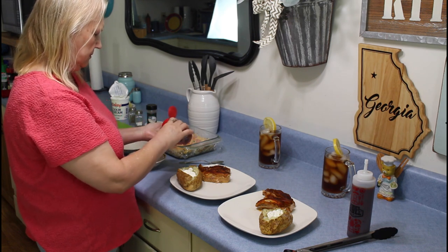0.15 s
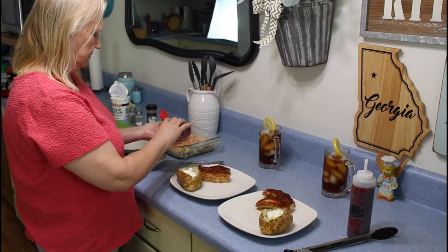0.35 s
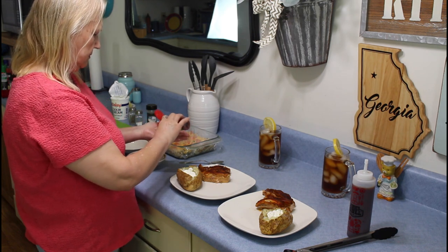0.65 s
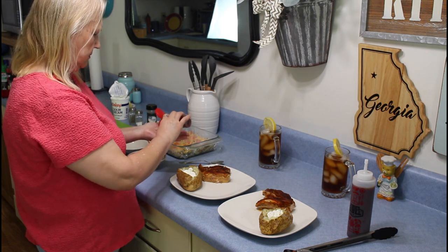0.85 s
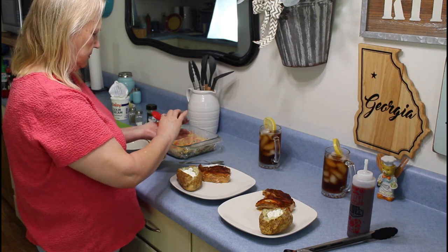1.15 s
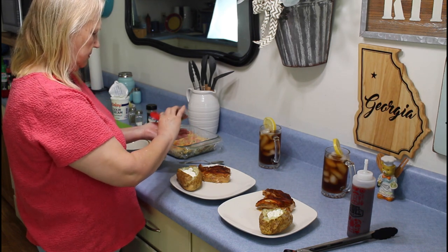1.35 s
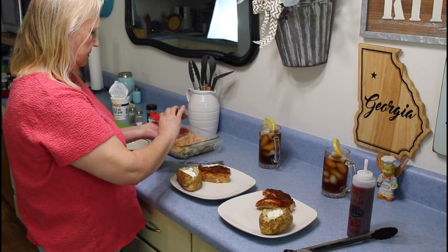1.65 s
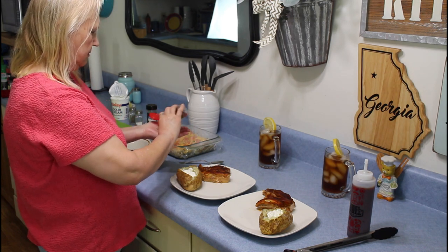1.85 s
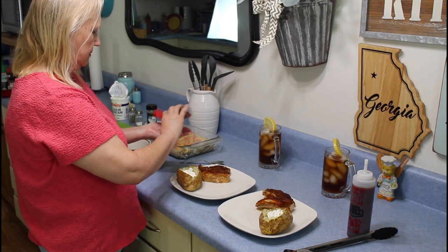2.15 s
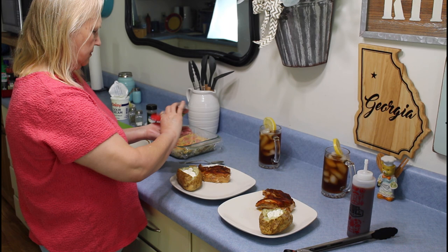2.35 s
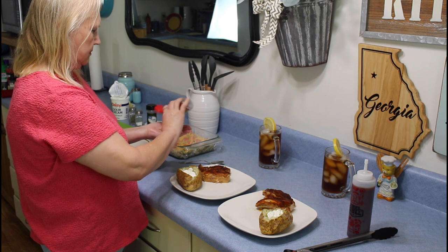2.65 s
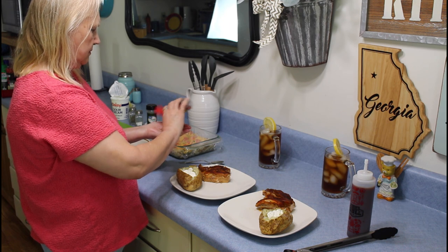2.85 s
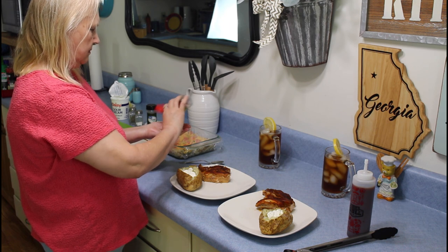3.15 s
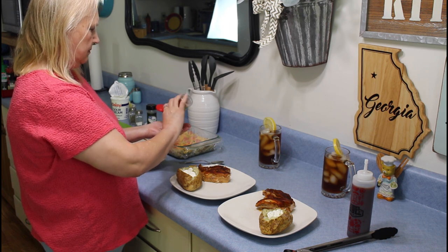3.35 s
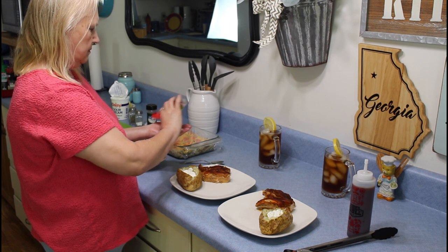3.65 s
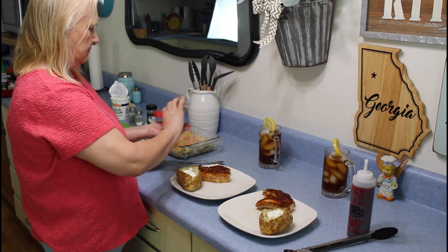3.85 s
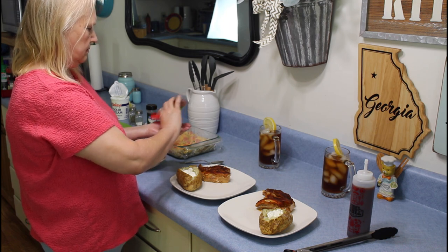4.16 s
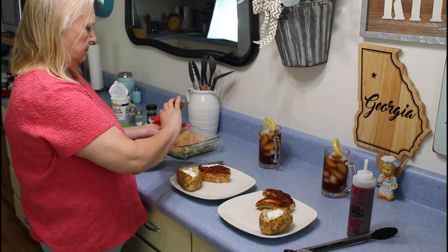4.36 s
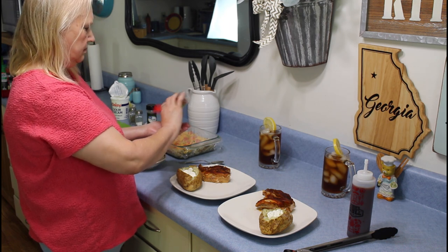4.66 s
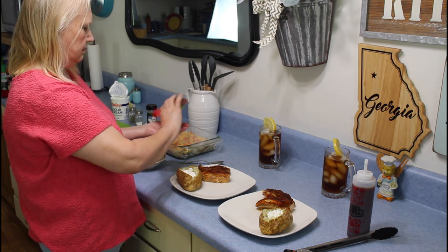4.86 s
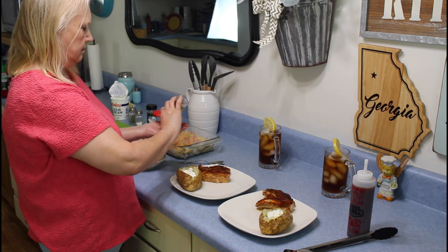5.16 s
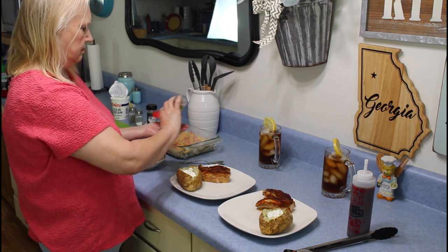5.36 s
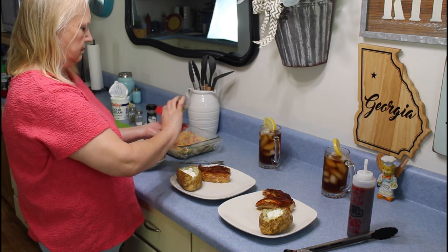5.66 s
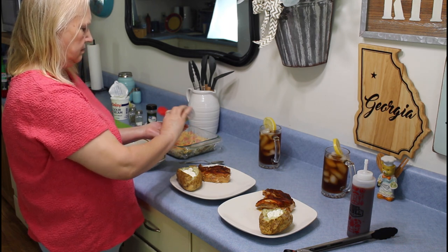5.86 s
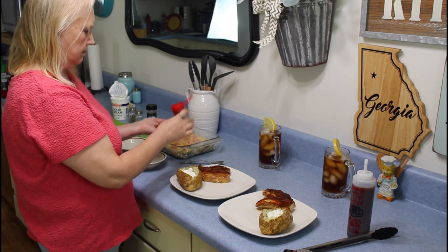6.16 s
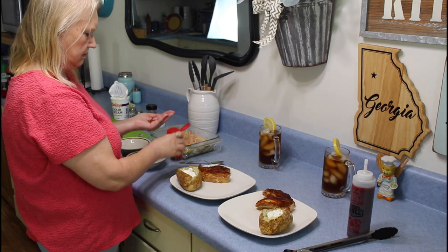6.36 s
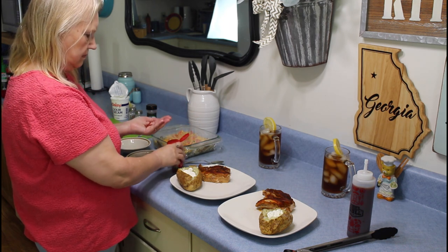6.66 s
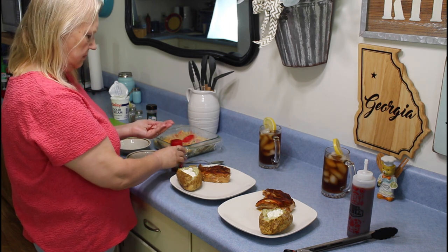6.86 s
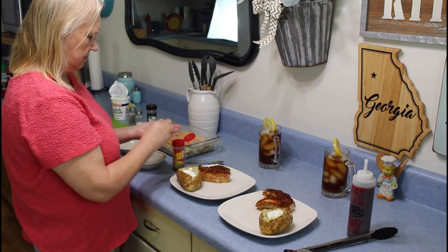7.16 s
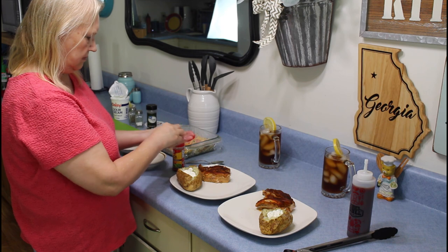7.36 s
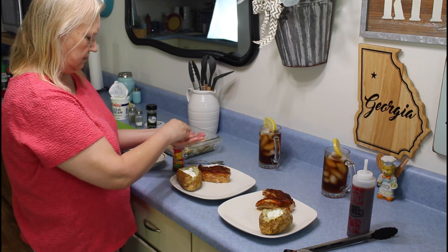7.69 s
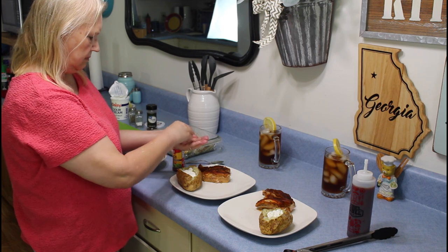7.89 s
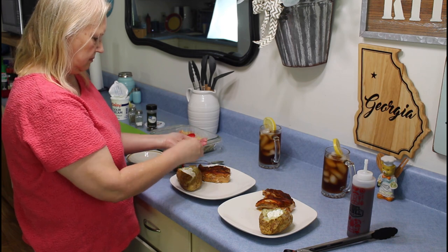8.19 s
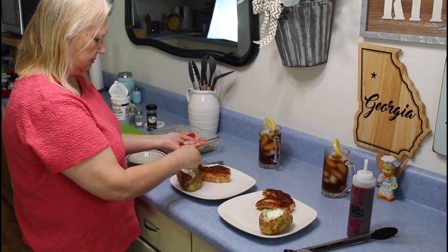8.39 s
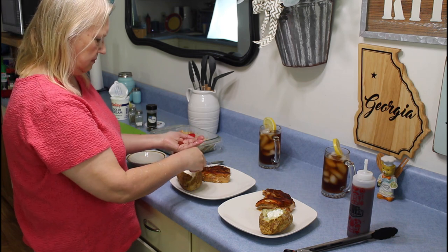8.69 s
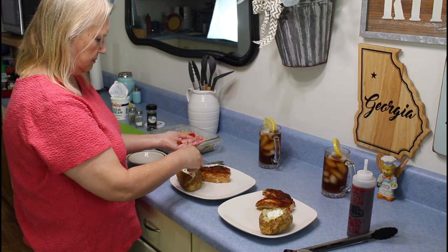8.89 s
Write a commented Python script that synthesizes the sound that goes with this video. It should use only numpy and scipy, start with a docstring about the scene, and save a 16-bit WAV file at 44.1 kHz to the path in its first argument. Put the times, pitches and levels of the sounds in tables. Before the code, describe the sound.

A quiet home kitchen with steady low appliance hum, faint hiss and short room echo, heard fairly close. From 0 to 0.9 seconds, small dried bits tick and tumble lightly in a plastic jar. Around 1 second slow strokes begin, soft at first, then from 1.4 settle into brisk shaking, about five or six full back-and-forth strokes a second. The bright, dry, grainy rattle grows steadily, loudest from about 3.7 to 5.1, with sharp slaps between pours. It briefly slackens near 5.2 to 5.5, bursts again until 5.8, then thins to scattered ticks by 6.4. At 6.66 the jar knocks loudly and hollowly on the counter, again more softly at 6.88, with tiny rocking taps until 7.1. From 7.4 to 8.0 and again near 8.7, fingers faintly pinch and sprinkle crumbs, with delicate ticks and dull scuffs near 8.9.

```python
"""In a quiet, humming kitchen, small dried bits are shaken in a plastic jar, which is then set on the counter.
Room: steady coloured noise, low swells, a faint thin tone, and echoes of the jar from decaying noise.
Fingers: grainy puffs of band-passed impacts pinch and sprinkle a few crumbs, with dull scuffs.
Counter: the jar knocks and rocks, ringing decaying sines under cracks of noise from its base.
Jar: every stroke swells and dies, driving random impacts through resonances of plastic and inner air."""
import sys
import numpy as np
from scipy import signal
from scipy.fft import rfft, irfft, next_fast_len
from scipy.io import wavfile
from scipy.ndimage import map_coordinates

SR = 44100
rng = np.random.default_rng(int(sys.argv[2]) if len(sys.argv) > 2 else 0)


def inscribe(sig):
    """Save sig as 16-bit PCM at rate SR to the path in sys.argv[1].

    A 1-D sig is mono; a 2-D sig holds one channel per row.
    Samples are clipped to [-1, 1] before scaling.
    """
    pcm = np.round(np.clip(np.atleast_2d(sig).T, -1, 1) * 32767)
    wavfile.write(sys.argv[1], SR, pcm.astype(np.int16))


N = 398223
TIME = np.arange(N) / SR  # s


def amp(db):
    """Decibels to gain."""
    return 10 ** (np.asarray(db) / 20)


def unit(x):
    """Scaled to rms 1."""
    return x / np.sqrt(np.mean(x ** 2) + 1e-20)


def along(points, hz):
    """Interpolates (f/Hz, value) points on a log frequency axis."""
    f, value = np.transpose(points)
    return np.interp(np.log(hz + 1), np.log(f + 1), value)


def filtered(x, response):
    """Multiplies the spectrum of x by a response of frequency."""
    m = next_fast_len(N + SR // 2)
    return irfft(rfft(x, m) * response(np.fft.rfftfreq(m, 1 / SR)), m)[:N]


def resonant(x, modes):
    """Sums causal resonances (f/Hz, width/Hz, level/dB) driven by x, with alternating signs."""
    def response(f):
        total = 0
        for k, (centre, width, db) in enumerate(modes):
            peak = 1j * f * width / (centre * centre - f * f + 1j * f * width)
            total = total + (-1) ** k * amp(db) * peak
        return total
    return filtered(x, response)


def swell(s, rise_ms, fall_ms):
    """Samples around s and their power: an exponential build-up turns at s into an exponential dying."""
    rise, fall = max(rise_ms, 5) / 1000, max(fall_ms, 5) / 1000  # s per 60 dB
    near = slice(max(round((s - rise) * SR), 0), round((s + fall) * SR))
    d = np.log(1e6) * (TIME[near] - s)  # a millionfold in power is 60 dB
    return near, 1 / (np.exp(-d / rise) + np.exp(d / fall))


def wobble(rate):
    """A smooth random curve through rate knots a second."""
    knots = rng.standard_normal(int(N * rate / SR) + 4)
    return map_coordinates(knots, [TIME * rate])


def impacts(per_second, spread_db, hiss):
    """Random impacts of unequal size over a dense hiss of tiny ones, at even mean power."""
    when, size, sign = rng.random(N), rng.exponential(size=N), rng.standard_normal(N)
    hits = when < per_second / SR
    blows = hits * amp(spread_db * np.minimum(size, 3)) * np.sign(sign)
    return unit(unit(blows / np.sqrt(per_second)) + hiss * rng.standard_normal(N))


# Room tone at the microphone, spectrum points: f/Hz, relative level/dB per Hz
ROOM_TONE = [(12, -53), (20, -19), (93, -10), (198, -11.5), (221, -7), (356, -10), (387, -14.5),
             (421, -17.5), (735, -16.5), (846, -16), (1120, -21.5), (1250, -20.5), (2890, -30.5),
             (15900, -32)]
ROOM_TONE_DB = -53.5  # rms


def hush():
    """Appliances and microphone hiss: steady coloured noise."""
    noise = rng.standard_normal(N)
    return amp(ROOM_TONE_DB) * unit(filtered(noise, lambda hz: amp(along(ROOM_TONE, hz))))


# How long the kitchen rings on: f/Hz, t60/s
KITCHEN_DECAY = [(200, 0.31), (1000, 0.43), (4000, 0.54), (12000, 0.12)]


def kitchen(x):
    """Echoes from eight decaying-noise tails, taken in turn every 0.11 s; each frequency dies at its own speed."""
    out, step = np.zeros(N + SR), round(.11 * SR)
    hz, t, z = signal.stft(rng.standard_normal((8, SR // 2)), SR, nperseg=256)
    decay = amp(-60 * t / along(KITCHEN_DECAY, hz)[:, None])
    tails = signal.istft(z * decay, SR, nperseg=256)[1]
    for k, start in enumerate(range(0, N, step)):
        tail = tails[k % len(tails)]
        wet = signal.fftconvolve(x[start:start + step], tail / np.linalg.norm(tail))
        out[start + 200:][:len(wet)] += wet  # the echoes start 200 samples late
    return out[:N]


# Puff times are the turn from build-up to dying; puff levels are rms before the swell shapes them.
# Shapes: (build-up, dying)/ms per 60 dB. Bands: f/Hz, width/Hz, level/dB relative to the puff.
# The low murmur of the room swells: t/s, level/dB
LOW_SWELLS = [(6.2, -55), (7.35, -55.5)]
LOW_SWELL_MS, LOW_SWELL_BANDS = (1200, 2700), [(284, 130, 0)]
# A faint thin tone in the room: t/s, level/dB, shape, bands
THIN_TONE = (7.55, -69, (3000, 2500), [(2300, 90, 0)])
# Dull scuffs: t/s, level/dB, f/Hz
SCUFFS = [(5.08, -34.5, 300), (5.1, -41, 190), (8.13, -65, 1400), (8.49, -58, 1380), (8.836, -49.5, 970),
          (8.87, -53.5, 350), (8.89, -50.5, 756)]
SCUFF_MS, SCUFF_WIDTH = (170, 290), 0.53  # band width as a share of its centre
# Fingers pinch the crumbs: t/s, level/dB, f/Hz of the main band
PINCHES = [(7.42, -47, 4600), (7.704, -51, 4500), (8.671, -53.5, 3300), (8.72, -61.5, 2700)]
PINCH_MS, PINCH_WIDTH_HZ = (32, 420), 2400
PINCH_SIDE_BANDS = [(1400, 1200, -4.5), (11700, 7600, -4)]
# Crumbs land together: t/s, level/dB
SPRINKLES = [(7.75, -51), (7.83, -48), (7.91, -55), (7.94, -45), (8.77, -61)]
SPRINKLE_MS, SPRINKLE_BANDS = (99, 225), [(9900, 14400, 0)]
# Single crumbs tick thinly: t/s, nominal peak level/dB
CRUMBS = [(7.6534, -43), (7.6775, -41), (7.7472, -39), (7.817, -40.5), (7.8833, -41), (7.9073, -38),
          (7.9372, -31), (8.0395, -42), (8.3643, -48), (8.4146, -46), (8.5972, -48), (8.7479, -46),
          (8.7663, -43.5), (8.8487, -51)]
CRUMB_MS, CRUMB_BANDS = (8, 50), [(12800, 5000, -9.5)]  # the band's rms lies below the peak


def rustles():
    """Band-passed grainy impacts in swelling puffs: room murmur, thin tone, scuffs, fingers and crumbs."""
    out, grit = np.zeros(N), impacts(2515, spread_db=3.5, hiss=0.89)
    puffs = [(s, db, SCUFF_MS, [(hz, SCUFF_WIDTH * hz, 0)]) for s, db, hz in SCUFFS]
    for s, db, hz in PINCHES:
        puffs.append((s, db, PINCH_MS, [(hz, PINCH_WIDTH_HZ, 0), *PINCH_SIDE_BANDS]))
    puffs.append(THIN_TONE)
    for rows, ms, bands in [(SPRINKLES, SPRINKLE_MS, SPRINKLE_BANDS),
                            (CRUMBS, CRUMB_MS, CRUMB_BANDS),
                            (LOW_SWELLS, LOW_SWELL_MS, LOW_SWELL_BANDS)]:
        puffs += [(s, db, ms, bands) for s, db in rows]
    for s, db, ms, bands in puffs:
        near, shape = swell(s, *ms)
        for hz, width_hz, band_db in bands:
            edges = np.clip([hz - width_hz / 2, hz + width_hz / 2], 50, 20000)
            band = signal.butter(3, edges, "band", fs=SR, output="sos")
            grains = unit(signal.sosfilt(band, grit[near]))
            out[near] += amp(db + band_db) * np.sqrt(shape) * grains
    return out


# Jar meets counter: t/s, overall level/dB, boom level/dB (modes below 320 Hz), crack level/dB;
# boom and crack are relative to the overall level
KNOCKS = [(6.658, -6.5, -1, -14), (6.878, -11.5, -4, -17.5), (6.965, -21, -7, -22), (7.0, -30, -12, -16),
          (7.03, -23.5, -10, -30), (7.072, -41, -9, -36), (7.111, -37.5, 0, -28.5)]
# Modes of the hollow counter: f/Hz, level/dB, t60/s
COUNTER_MODES = [(114, -17, 0.1), (171, -14.5, 0.14), (267.4, -0.5, 0.155), (361, -11.5, 0.11),
                 (474, -2.5, 0.058), (497, -2, 0.064), (585, 0, 0.037), (885, -2, 0.025),
                 (950, -3.5, 0.024), (1147, -7.5, 0.031), (1303, -10, 0.034)]
# Colour of the crack from the base of the jar: f/Hz, width/Hz, level/dB
BASE_MODES = [(1840, 1900, 3.5), (2750, 1160, 6), (3850, 730, -0.5), (11230, 4500, -4.5)]


def knocks():
    """Each contact rings the hollow counter at new strengths, with a crack from the base of the jar."""
    out, crack, t = np.zeros(N), np.zeros(N), np.arange(SR // 2) / SR
    for s, db, boom_db, crack_db in KNOCKS:
        at = slice(round(s * SR), round(s * SR) + len(t))
        crack[at] += amp(db + crack_db - 60 * t / 0.11) * rng.standard_normal(len(t))
        for hz, mode_db, t60 in COUNTER_MODES:
            lift_db = boom_db * (hz < 320) + rng.normal(0, 0.88)
            build = (1 - np.exp(-t * hz / 1.8)) ** 2  # the hollow top takes a few cycles to speak
            decay = amp(db + mode_db + lift_db - 60 * t / t60)
            out[at] += decay * np.sin(2 * np.pi * hz * t) * build
    return out + resonant(crack, BASE_MODES)


# Stroke times are the turn from build-up to dying; build-up and dying are ms per 60 dB.
# Downstrokes, the heap rushes to the mouth of the jar: t/s, patter level/dB, build-up/ms, dying/ms
POURS = [(1.014, -28.5, 161.5, 537), (1.32, -32.5, 95.5, 600), (1.499, -24, 83.5, 502),
         (1.685, -23, 150, 193), (1.871, -19, 186, 215.5), (2.066, -17, 308.5, 145),
         (2.204, -20, 40.5, 334), (2.399, -17.5, 120, 177), (2.571, -16, 83, 276),
         (2.742, -16, 65.5, 283.5), (2.929, -15, 97, 248), (3.105, -15, 65.5, 244),
         (3.285, -14.5, 85.5, 238.5), (3.469, -15, 96.5, 201), (3.662, -12.5, 105, 232),
         (3.844, -14.5, 193, 262.5), (4.014, -14.5, 112, 172), (4.208, -10.5, 104, 149),
         (4.386, -12, 112, 167.5), (4.581, -13, 285.5, 137), (4.754, -10, 113, 151),
         (4.934, -11.5, 154, 169.5), (5.11, -14, 167, 234.5), (5.615, -11.5, 155.5, 162),
         (5.815, -15.5, 371, 202), (6.138, -19, 293, 66.5), (6.174, -21, 199, 296)]
# Lid, shoulder, wall, air in a pour: level/dB above patter
POUR_RINGS_DB = [-14, -12, -13.5, -15]
# Slow tilts, a few bits tumble over the heap: t/s, patter level/dB, build-up/ms, dying/ms,
# jar level/dB above patter
TUMBLES = [(0.037, -36, 6, 340, -30), (0.097, -31, 36, 490, -28), (0.251, -38, 105, 470, -25),
           (0.335, -34.5, 63, 600, -27), (0.43, -38, 400, 595.5, -19), (0.51, -28.5, 88, 300, -15),
           (0.6, -37.5, 198, 970, -10), (0.7, -43, 150, 450, -12), (0.8, -41, 6, 151, -16),
           (1.97, -29.5, 249, 110, -32), (3.558, -23.5, 27, 140, -30), (5.241, -20.5, 63, 230, -21),
           (5.411, -20, 110, 260, -19.5), (5.494, -27, 21, 190, -25), (5.978, -30.5, 220, 110, -23),
           (6.04, -30, 98.5, 110, -12), (6.332, -30.5, 143, 280, -24), (6.4, -40, 100, 250, -22)]
# Lid, shoulder, wall, air in a tumble: level/dB above the jar column
TUMBLE_RINGS_DB = [-2, -2, -0.5, -0.5]
# Upstrokes, the heap slaps the hard end: t/s, patter level/dB, dying/ms, lid level/dB above patter
SLAPS = [(1.444, -27, 69.5, -5), (1.617, -25.5, 86, -6), (1.789, -29, 69, -12), (1.995, -21.5, 118, -4.5),
         (2.876, -22, 60, -7), (3.069, -21.5, 38, -6), (3.237, -19, 101.5, -4.5), (3.429, -27, 86.5, -1.5),
         (3.595, -14.5, 169, -7), (3.773, -10, 115, -3.5), (4.137, -10, 99, -5), (4.319, -8, 67.5, -6),
         (4.503, -11, 78, -4), (4.687, -10.5, 79, -7), (4.859, -11, 124, -7.5), (5.041, -13.5, 115, -12),
         (5.544, -13.5, 135, -11.5), (5.729, -11, 93, -11), (5.95, -29.5, 62, -5.5), (6.08, -16, 140, -5.5)]
# Shoulder, wall, air in a slap: level/dB above patter
SLAP_RINGS_DB = [-10, -11.5, -21.5]
SLAP_RISE_MS, SLAP_SHARPENS_MS_PER_DB = 66.6, 2.5  # build-up at -29 dB; harder is more sudden
# Sliding follows the pours and tumbles: its patter below theirs, then lid, shoulder, wall, air above its patter
SLIDE_DB, SLIDE_RINGS_DB, SET_DOWN_S = -15.5, [-17.5, -22.5, -16.5, -18.5], 6.5
# The shrinking heap moves lid, shoulder, wall and air ever less: level drop/dB per s
EMPTYING_DB_PER_S = [0.12, 0.2, .3, 1.24]
CLUMP_DB, CLUMPS_PER_S = 1.4, 70  # bits arrive in uneven handfuls


def motion():
    """Drives patter, lid, shoulder, wall and air: every stroke swells and dies, bits slide in between."""
    strokes = [(*row, POUR_RINGS_DB) for row in POURS]
    strokes += [(*row, jar_db + np.array(TUMBLE_RINGS_DB)) for *row, jar_db in TUMBLES]
    # sliding fades to the set-down
    s, db = np.transpose(sorted(stroke[:2] for stroke in strokes) + [(SET_DOWN_S, -80)])
    slide_db = np.interp(TIME, s, db) + SLIDE_DB
    power = amp(2 * (slide_db + np.array([0, *SLIDE_RINGS_DB])[:, None]))
    for s, db, fall_ms, lid_db in SLAPS:
        rise_ms = SLAP_RISE_MS - SLAP_SHARPENS_MS_PER_DB * (db + 29)
        strokes.append((s, db, rise_ms, fall_ms, [lid_db, *SLAP_RINGS_DB]))
    for s, db, rise_ms, fall_ms, rings_db in strokes:
        near, shape = swell(s, rise_ms, fall_ms)
        power[:, near] += amp(2 * (db + np.array([0, *rings_db])))[:, None] * shape
    clumps_db = CLUMP_DB * wobble(CLUMPS_PER_S)
    emptying_db = np.outer([0, *EMPTYING_DB_PER_S], TIME)
    return np.sqrt(power) * amp(clumps_db - emptying_db)


def bounce(x):
    """The counter returns each sound 2.2 ms later, a path some 75 cm longer."""
    lag = round(0.0022 * SR)
    return x + .65 * np.pad(x, (lag, 0))[:N]


# The clearest lone bits on the plastic: t/s, nominal peak level/dB before the counter's return
LONE_BITS = [(0.0378, -33), (0.0902, -17), (0.1044, -19), (0.2678, -23), (0.3247, -19), (0.3441, -19),
             (0.4025, -21), (0.4494, -18), (0.4678, -19), (0.5172, -16), (0.5914, -25), (0.6724, -24),
             (0.7981, -23), (0.9133, -32), (0.9941, -17), (1.2037, -27), (1.282, -26), (5.3587, -18),
             (5.902, -19), (5.9743, -19), (6.0462, -11), (6.334, -17), (6.3994, -24), (7.9374, -33)]
# The other lone bits; nominal peak above the patter around them
STRAYS_PER_S, STRAY_DB, STRAY_SPREAD_DB = 45, 5.5, 1.5


def ticks(patter):
    """Single bits striking the plastic: a crack of a millisecond through its highest resonances."""
    blows, t, thin = np.zeros(N + SR), np.arange(48) / SR, PLASTIC_MODES[3:]
    when, size = rng.random(N), rng.standard_normal(N)
    strays = when < STRAYS_PER_S / SR
    peaks = strays * patter * amp(STRAY_DB + STRAY_SPREAD_DB * size)
    for s, db in LONE_BITS:
        peaks[round(s * SR)] = amp(db)
    for at in np.flatnonzero(peaks):
        crack = unit(amp(-60 * t / .002) * rng.standard_normal(len(t)))
        blows[at:at + len(t)] += amp(-10) * peaks[at] * crack  # rms set 10 dB below the peak
    impulse_ring = resonant(np.arange(N) == 0, thin)
    return bounce(resonant(blows[:N], thin)) / np.linalg.norm(impulse_ring)


def struck(size, stream, modes, flare_db):
    """The blows land at ever new spots, so each mode flares and fades on its own."""
    ring = np.zeros(N)
    for k, mode in enumerate(modes):
        flare = amp(flare_db * wobble(22))
        ring += (-1) ** k * resonant(size * stream * flare, [mode])
    return ring / np.std(resonant(stream, modes))


# Resonances of the jar, each table: f/Hz, width/Hz, level/dB
# Thin plastic
PLASTIC_MODES = [(3240, 2700, -14), (4560, 1050, -5.5), (5940, 3470, -9.5), (7710, 1390, -2.5),
                 (10390, 1900, -1.5), (12160, 2930, 0.82), (14100, 4100, -6)]
# Lid
LID_MODES = [(1551, 102, 0), (1720, 65, 5), (1864, 77, 0.5), (1964, 140, -1.5)]
# Shoulder
SHOULDER_MODES = [(2347, 310, -1), (2736, 166, 6), (2930, 135, 2.5), (3167, 43, 9)]
# Wall
WALL_MODES = [(770.5, 42, -9.5), (1046, 63, -2.5), (1165.5, 42, 3), (1313, 178, -5.5)]
# Hollow of the jar while the bits fly
AIR_OPEN_MODES = [(536, 170, 0)]
# The hollow, lower once they heap at the mouth
AIR_FILLED_MODES = [(300, 220, -11.5), (425.4, 90, 5.5)]


def rattle(patter, lid, shoulder, wall, air):
    """The bits patter on the thin plastic and ring lid, shoulder, wall and the air inside."""
    crowd = 700 + 25000 * patter  # impacts a second: harder throws carry more bits
    small = impacts(crowd, spread_db=-0.5, hiss=0.97)
    large = impacts(.25 * crowd, spread_db=1.5, hiss=0.67)  # only the heavy bits move the low modes
    flying = np.roll(air, -round(0.0086 * SR))  # the heap leaves the base before it lands
    heaped = amp(-1.0) * np.roll(air, round(0.0042 * SR))
    plastic_ring = struck(patter, small, PLASTIC_MODES, flare_db=0.99)
    lid_ring = struck(lid, large, LID_MODES, flare_db=2.0)
    shoulder_ring = struck(shoulder, small, SHOULDER_MODES, flare_db=3)
    wall_ring = struck(wall, large, WALL_MODES, flare_db=2.5)
    open_ring = struck(flying, large, AIR_OPEN_MODES, flare_db=1.0)
    filled_ring = struck(heaped, large, AIR_FILLED_MODES, flare_db=1.5)
    return plastic_ring + lid_ring + shoulder_ring + wall_ring + open_ring + filled_ring


def scene():
    """The bits, the jar on the counter and the fingers, in the room."""
    drive = motion()
    bits = rattle(*drive) + ticks(drive[0])
    jar = knocks()
    echoes = kitchen(amp(-8.5) * bits + amp(-3.5) * jar)
    return (bits + jar + echoes + rustles() + hush())[None]


TOP_HZ = 15850


def record(dry):
    """The microphone chain rounds off the highest peaks and keeps nothing above its band limit."""
    soft = dry[0] / (1 + np.abs(dry[0] / .9) ** 6) ** (1 / 6)
    return filtered(soft, lambda hz: hz < TOP_HZ)[None]


dry = scene()
out = record(dry)
inscribe(out)
```